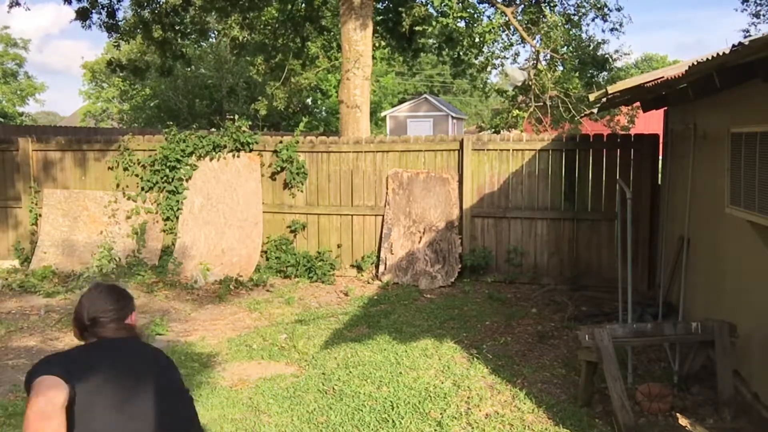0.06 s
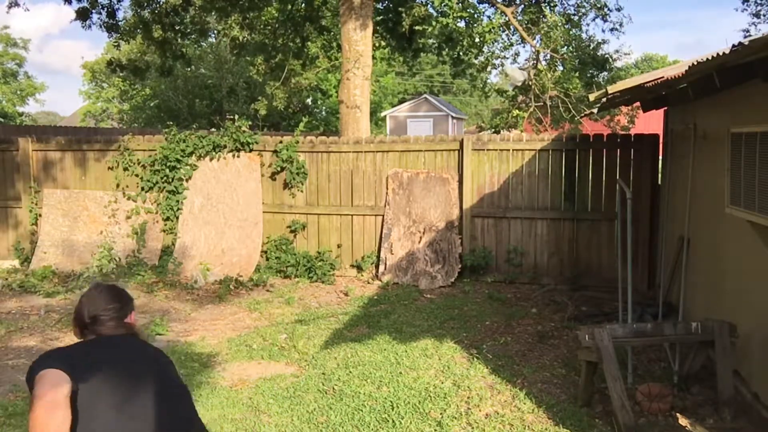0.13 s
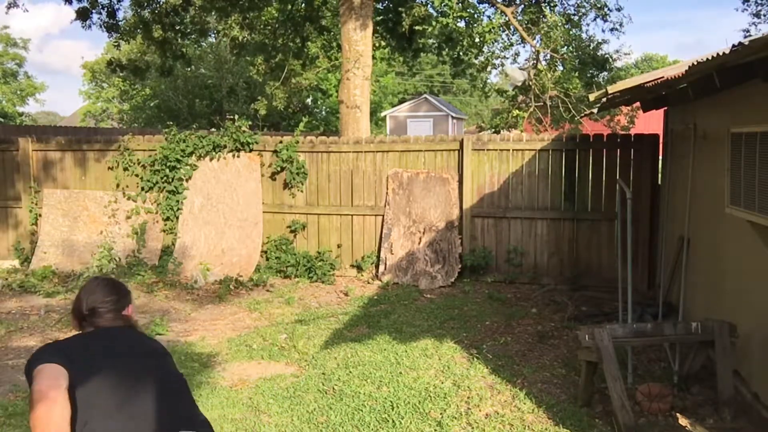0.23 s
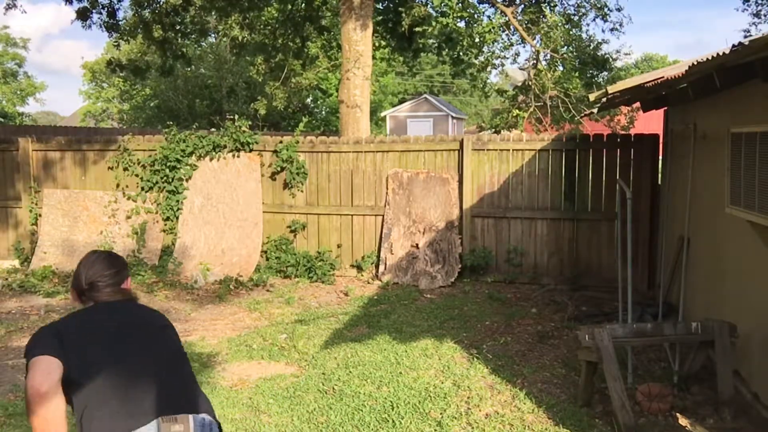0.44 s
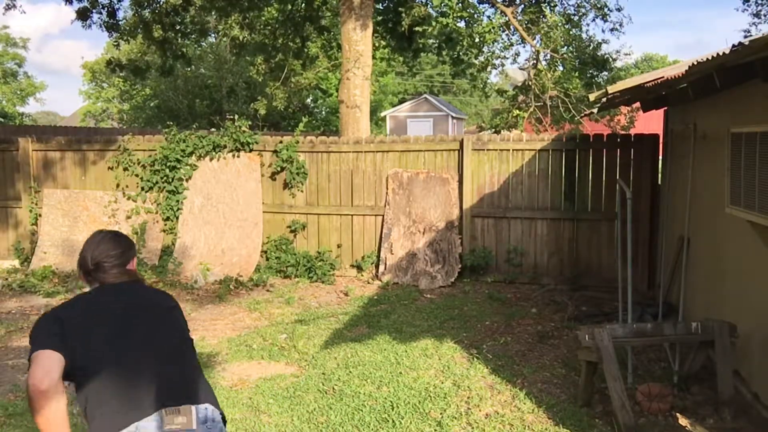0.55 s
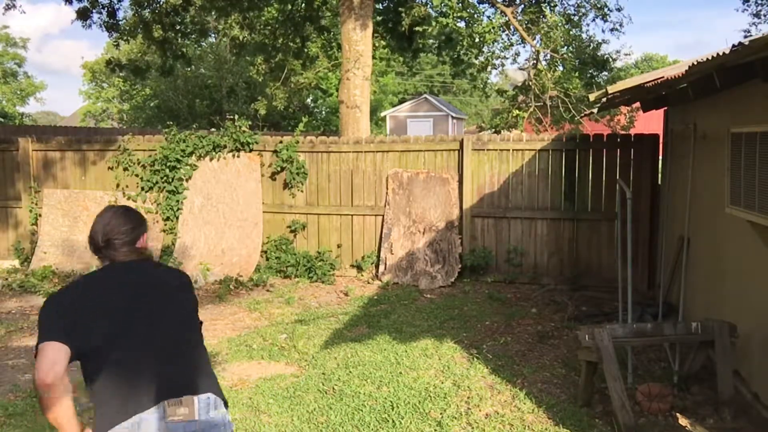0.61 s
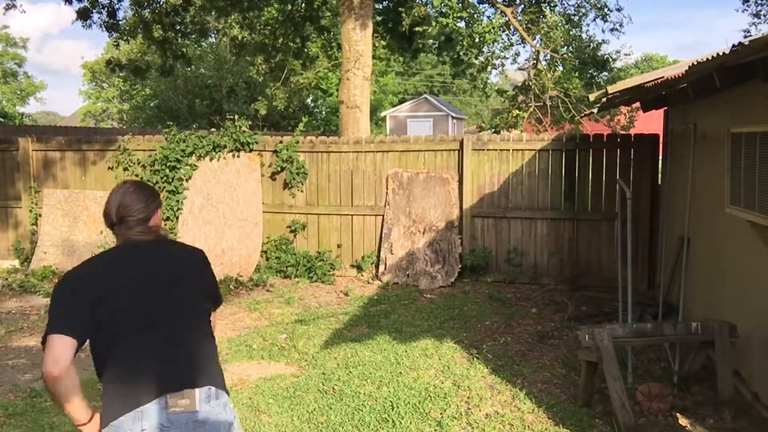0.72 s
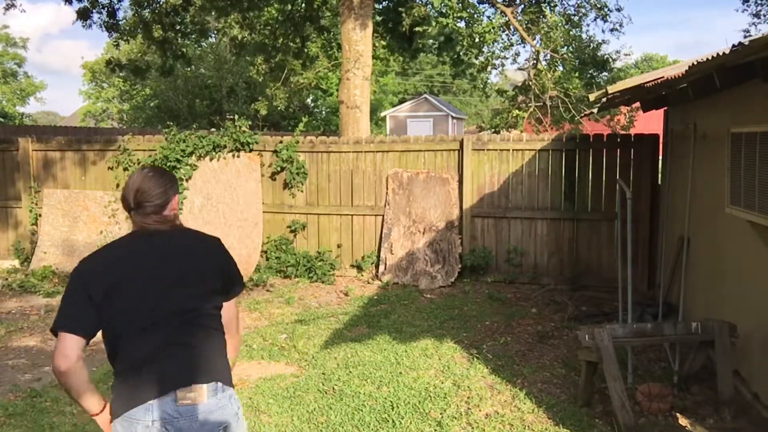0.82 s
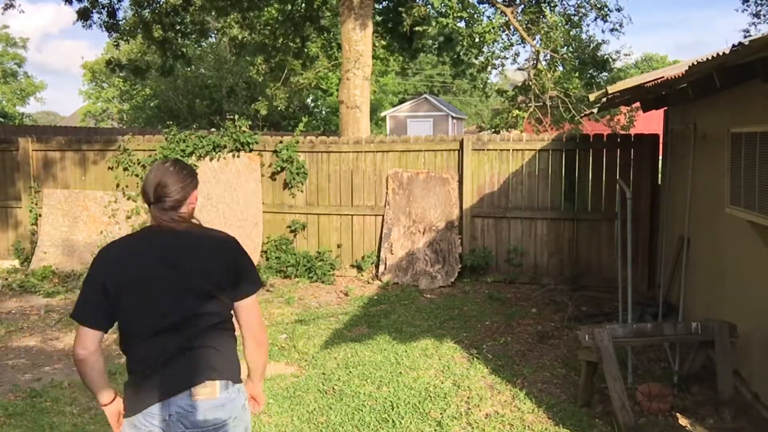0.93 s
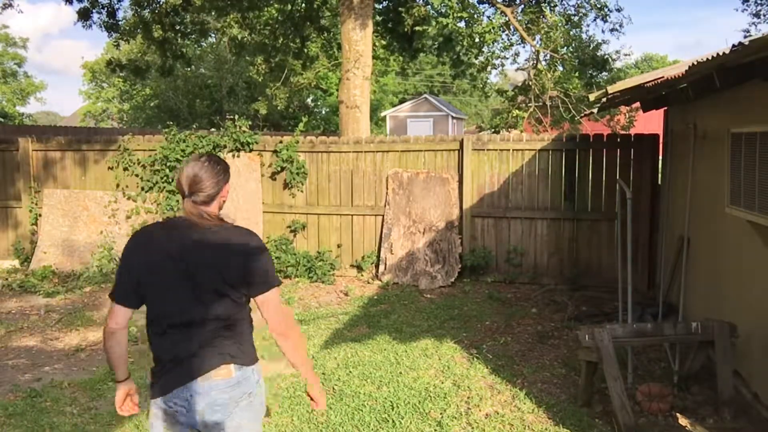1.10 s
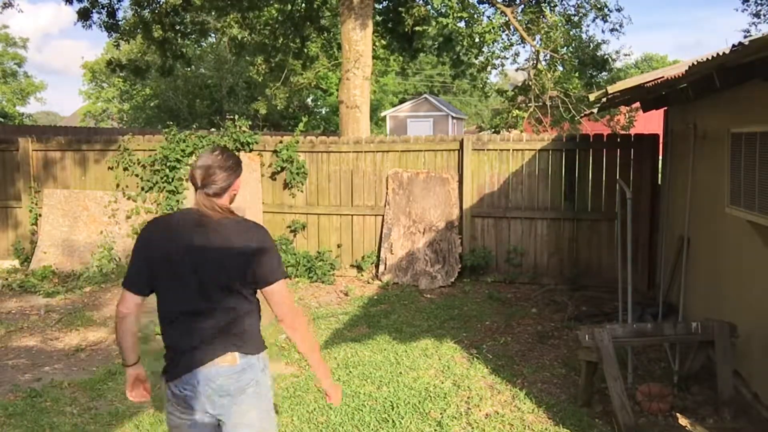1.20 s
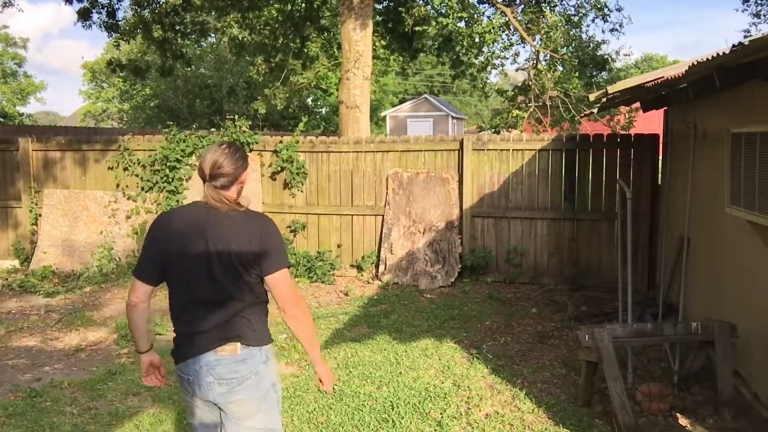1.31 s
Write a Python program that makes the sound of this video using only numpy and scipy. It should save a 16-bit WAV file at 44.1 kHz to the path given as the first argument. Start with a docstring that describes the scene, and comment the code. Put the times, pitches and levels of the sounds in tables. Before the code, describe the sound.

In a backyard, a knife strikes a wooden target once, a sharp knock with a short echo. Soft steps in the grass and a barely audible dove coo follow, over light wind on the microphone.

```python
"""A sharp crack, a wooden knock and a faint ring of steel: a thrown knife bites into a backyard board.
The point breaks fibres, the board bends and rings, and ground, fence and shed echo the crack.
The thrower then steps through the grass, with a faint high ting and one far-off dove's coo.
Light wind rumbles on the microphone throughout, over a quiet hush of town and leaves."""
import sys
import numpy as np
from scipy import signal
from scipy.fft import rfft, irfft, next_fast_len
from scipy.io import wavfile
from scipy.ndimage import uniform_filter1d

SR = 44100
rng = np.random.default_rng(int(sys.argv[2]) if len(sys.argv) > 2 else 0)


def output_pcm(signal):
    """Save a mono or channel-first signal as 16-bit PCM at the path in sys.argv[1].

    Samples are clipped to [-1, 1] before scaling.
    """
    pcm = np.clip(np.atleast_2d(signal).T, -1, 1) * 32767
    wavfile.write(sys.argv[1], SR, np.round(pcm).astype(np.int16))


N = 59535
T = np.arange(N) / SR
HIT_S = .2603  # the point enters the wood


def knife(bite_s=.0025, bite_rise_s=.00095, push_s=.0013):
    """The point cracks fibres; wood and blade ring once it pushes home. Returns (crack, ringing)."""
    # breaking fibres: t/s, level/dB
    fibres = [(.2605, -18), (.26155, -12.5), (.26205, -11), (.26255, -14.5)]
    # spectrum of the crack: f/Hz, level/dB
    crack_eq = [(150, -24), (500, -0.5), (900, -1.5), (1200, -8.5), (1600, 1), (2000, 0), (2400, 1.5),
                (3200, 0), (3900, -19.5), (4400, -3), (5500, -8.5), (6300, -5.5), (6900, -13), (7700, -13),
                (8600, -13.5), (10500, -21.5), (15500, -21)]
    # dense short ring of the wood: f/Hz, level/dB
    grain_eq = [(80, -7), (250, 3.5), (450, -3), (700, 2), (1000, -0.5), (1300, 3), (2000, -11),
                (3000, -3.5), (5000, -16.5), (8000, -16), (11000, -23.5), (15500, -20)]
    # modes of the board: f/Hz, level/dB, t60/s
    board_modes = [(63, -3, 0.32), (125.8, -8.5, 0.31), (152.3, -4.5, .2), (193, -10, 0.14),
                   (261, -15, 0.266), (301, -11.5, .14), (400.3, 3, 0.093), (452, -7.5, 0.074),
                   (579.6, -9.5, 0.17), (787, -13.5, 0.15), (983, -16, 0.22), (1206, -9.5, 0.14),
                   (1277, -10.5, 0.19), (2458, -15, 0.21)]
    # modes of the steel blade: f/Hz, level/dB, t60/s
    blade_modes = [(2719, -52, 1.4), (4140, -51, 1.1), (4468, -50, .45), (4597, -50, .9), (6363, -54, 1.1),
                   (7421, -56, .9), (8667, -51, .6)]
    entering = rise(HIT_S, bite_rise_s) * (T < HIT_S + bite_s)
    push = rise(HIT_S + bite_rise_s, push_s)
    crack = colour(taps(fibres) + undb(-11) * noise() * entering, crack_eq)
    grain = undb(-11) * colour(noise() * push * fade(HIT_S, t60_s=.063), grain_eq)
    tones = push * (undb(-12.5) * ring(board_modes) + ring(blade_modes))
    return crack, grain + board_flex() + board_knocks() + tones


def board_flex(start_hz=224.7, end_hz=70.4, glide_s=.0086, peak_s=.0091):
    """The whole board bends; the wave spreads highs first, so the thud falls in pitch."""
    age_s = np.maximum(T - HIT_S, 0)
    cycles = end_hz * age_s + (start_hz - end_hz) * glide_s * (1 - np.exp(-age_s / glide_s))
    swell = (age_s / peak_s * np.exp(1 - age_s / peak_s)) ** 3
    return -undb(-7.5) * swell * np.sin(2 * np.pi * cycles)


def board_knocks():
    """The struck board knocks against its support."""
    # contacts: t/s, level/dB
    knocks = [(.2655, -9.5), (.2703, -11.5), (.2832, -12)]
    # spectrum of a knock: f/Hz, level/dB
    knock_eq = [(60, -20), (120, -12), (230, -4), (400, -1.5), (600, -1), (900, -13), (1280, -3),
                (1600, -16), (2500, -34), (15000, -59)]
    return colour(taps(knocks), knock_eq)


def yard(crack, build_s=.012):
    """Band-limited echoes of the crack; decaying noise for yard scatter and the wash from the trees."""
    # ground, fence and shed echoes: delay/s, level/dB, low edge/Hz, high edge/Hz
    reflections = [(.0035, -10, 930, 3000), (.0093, -8, 4000, 8000), (0.0149, -11, 2520, 13000),
                   (0.0195, -7.5, 400, 3470), (.0245, -12, 5330, 10000), (.040, -11.5, 2040, 5040),
                   (.074, -6, 970, 1250), (.082, -19, 900, 4000)]
    # scatter from the yard: f/Hz, level/dB
    scatter_eq = [(100, -2.5), (400, 5.5), (700, -2), (1200, 3.5), (2000, -4), (3000, -5.5), (4400, -6.5),
                  (5300, -12), (6400, -11.5), (8500, -13), (11000, -17.5), (15500, -16.5)]
    # late wash from the trees: f/Hz, level/dB
    trees_eq = [(300, 1.5), (1200, -2.5), (3000, 1), (4500, -2.5), (5000, -9.5), (6200, -2.5),
                (7500, -13.5), (9000, -9), (11000, -16), (15500, -19)]
    echoes = 0
    for delay_s, db, low_hz, high_hz in reflections:
        band = signal.butter(1, [low_hz, high_hz], "bandpass", fs=SR, output="sos")
        echo = signal.sosfilt(band, crack)
        echoes += undb(db) * np.interp(T - round(delay_s * SR) / SR, T, echo, left=0)
    build = rise(HIT_S, build_s)
    scatter = undb(-18.5) * colour(gritty(spread_db=3) * build * fade(HIT_S, t60_s=.3), scatter_eq)
    wash = undb(-37.5) * colour(noise() * build * fade(HIT_S, t60_s=.9), trees_eq)
    return echoes + scatter + wash


def steps(attack_s=.011):
    """A foot lands in a few dull thumps; grass brushes the shoes and stalks snap."""
    # soft thumps of the feet: t/s, level/dB
    thumps = [(0.6799, -34.5), (0.696, -28), (0.7031, -35.5), (0.7152, -35), (.7188, -40)]
    # spectrum of a thump: f/Hz, level/dB
    thump_eq = [(60, -3), (200, 1), (400, 8), (750, -1), (1100, -35), (3000, -40), (15000, -54)]
    # rustles of grass and clothes: t/s, fall time/s, level/dB, tilt/(dB/octave)
    swishes = [(-.012, 0.063, -49, 0), (0.645, 0.048, -50, 3), (0.678, 0.16, -58, 7),
               (0.871, 0.15, -59, 0.5), (0.979, 0.088, -54.5, 2), (1.033, 0.053, -54, 0),
               (1.071, 0.11, -54, -0.5), (1.198, 0.037, -59.5, -5), (1.204, 0.029, -58, 3)]
    # spectrum of a rustle: f/Hz, level/dB
    grass_eq = [(800, -12), (3000, 7.5), (6000, 2), (9500, 2), (11000, -1.5), (15500, -6)]
    # dry stalks snapping: t/s, level/dB, f/Hz
    snaps = [(.886, -47.5, 7900), (0.99, -49, 12500), (1.027, -48, 8950), (1.047, -60, 5600),
             (1.086, -52, 4500), (1.101, -45.5, 3230), (1.194, -47, 2290)]
    settling = undb(-12) * noise() * sum(undb(db) * fade(t_s, t60_s=.073) for t_s, db in thumps)
    out = colour(taps(thumps) + settling, thump_eq)
    for t_s, fall_s, db, tilt_db_oct in swishes:
        envelope = rise(t_s, attack_s) * (1 - rise(t_s + attack_s, fall_s))
        out += undb(db) * colour(envelope * gritty(spread_db=3.5), grass_eq, tilt_db_oct)
    for t_s, db, hz in snaps:
        snap_eq = [(hz / 2, -20), (hz, 0), (hz * 2, -20)]
        out += undb(db) * colour(noise() * fade(t_s, t60_s=.019), snap_eq)
    return out


def ting(start_s=.675, hz=9500):
    """A thin high tone that dies away during the step."""
    return undb(-56.5) * np.sin(2 * np.pi * hz * T) * fade(start_s, t60_s=.33)


def dove(start_s=.92, length_s=.17, start_hz=757, sag_hz_per_s=480):
    """A distant dove coos one soft falling note."""
    age_s = np.clip(T - start_s, 0, length_s)
    cycles = start_hz * age_s - sag_hz_per_s * age_s ** 2 / 2
    return undb(-53.5) * np.sin(np.pi * age_s / length_s) * np.sin(2 * np.pi * cycles)


def wind(floor_db=-36.5):
    """Low turbulence on the microphone swells in short buffets."""
    # buffets: peak t/s, width/s, level/dB
    gusts = [(0.024, 0.044, -26), (0.206, 0.066, -24), (.445, 0.023, -30), (0.529, 0.022, -23.5),
             (0.585, 0.026, -28), (0.766, .04, -30), (0.836, 0.032, -28.5), (0.898, 0.083, -24.5),
             (0.987, 0.069, -27), (1.239, 0.03, -32)]
    # spectrum of the turbulence: f/Hz, level/dB
    wind_eq = [(12, -11.5), (25, -2.5), (45, 2), (65, -2.5), (90, -15.5), (125, -15), (170, -34.5),
               (400, -42.5), (15000, -100)]
    swirl = signal.hilbert(np.roll(colour(noise(), wind_eq), N // 2))
    running_rms = np.sqrt(uniform_filter1d(abs(swirl) ** 2, size=1000) / 2)
    buffets = sum(undb(db) * np.exp(-8 * ((T - t_s) / width_s) ** 2) for t_s, width_s, db in gusts)
    return swirl.real / running_rms * np.hypot(undb(floor_db), buffets)


def hush():
    """Distant town and leaves: soft noise that drifts in level."""
    # spectrum of the hush: f/Hz, level/dB
    hush_eq = [(100, 6), (200, 3), (400, -0.5), (800, -5.5), (1600, -9), (3000, -17.5), (4300, -20),
               (5200, -24.5), (9500, -26), (10500, -29.5), (15500, -28)]
    # level contour: t/s, level/dB
    contour = [(0, -46), (.2, -49), (.6, -45.5), (.85, -47.5), (1.2, -46.5), (1.35, -47)]
    times_s, levels_db = np.array(contour).T
    return colour(noise(), hush_eq) * undb(np.interp(T, times_s, levels_db))


def undb(db):
    """Decibels to gain."""
    return 10 ** (np.asarray(db) / 20)


def colour(x, eq, tilt_db_oct=0):
    """Filter shaped by (f/Hz, level/dB) points and a tilt, scaled to unit power gain."""
    size = 2 * next_fast_len(N)
    octave = np.log2(np.maximum(np.arange(size // 2 + 1) * SR / size, 1))
    hz, db = np.array(eq, float).T
    gain = undb(np.interp(octave, np.log2(hz), db) + tilt_db_oct * octave)
    cepstrum = irfft(np.log(gain / np.sqrt(np.mean(gain ** 2))))
    cepstrum[1:size // 2] *= 2  # fold to minimum phase: no pre-ring
    cepstrum[size // 2 + 1:] = 0
    return irfft(rfft(x, size) * np.exp(rfft(cepstrum)))[:N]


def noise():
    """White noise, unit RMS."""
    return rng.standard_normal(N)


def gritty(spread_db):
    """Unit-RMS noise in 32-sample grains of uneven level."""
    grains = noise() * undb(spread_db * np.repeat(noise(), 32)[:N])
    return grains / grains.std()


def fade(start_s, t60_s):
    """Sudden start, exponential decay."""
    return (T >= start_s) * np.exp(-np.log(1000) * np.maximum(T - start_s, 0) / t60_s)


def rise(start_s, length_s):
    """Linear ramp from 0 to 1."""
    return np.clip((T - start_s) / length_s, 0, 1)


def ring(modes):
    """Decaying sine modes set off by the blow."""
    return sum(undb(db) * np.sin(2 * np.pi * hz * (T - HIT_S)) * fade(HIT_S, t60_s)
               for hz, db, t60_s in modes)


def taps(rows):
    """One impulse per (t/s, level/dB) row, with the energy of 1 ms at that level."""
    return sum(undb(db) * np.sqrt(SR / 1000) * np.sinc((T - t_s) * SR) for t_s, db in rows)


def scene():
    """Mono mix of the blow, its echoes, the steps and the background."""
    crack, ringing = knife()
    return (crack + ringing + yard(crack) + steps() + ting() + dove() + wind() + hush())[None]


def record(dry):
    """The recorder rounds the loudest peaks and cuts the top."""
    top_hz = 15900
    lowpass = signal.ellip(10, .2, 80, top_hz, fs=SR, output="sos")
    return signal.sosfilt(lowpass, np.tanh(dry))


dry = scene()
out = record(dry)
output_pcm(out)
```